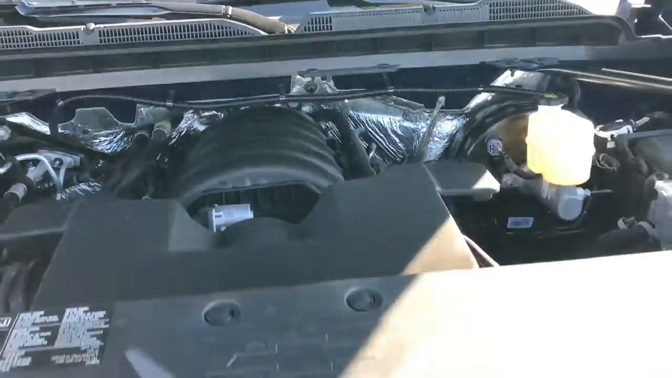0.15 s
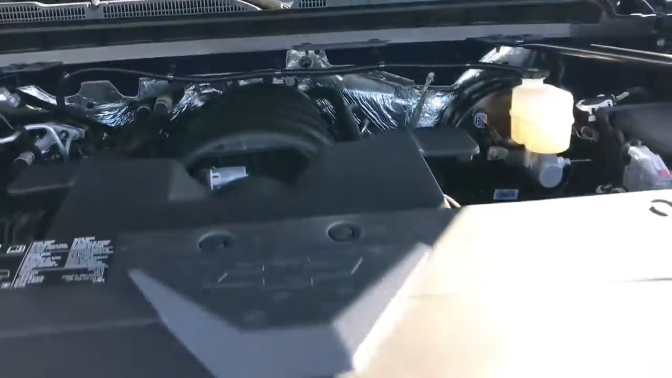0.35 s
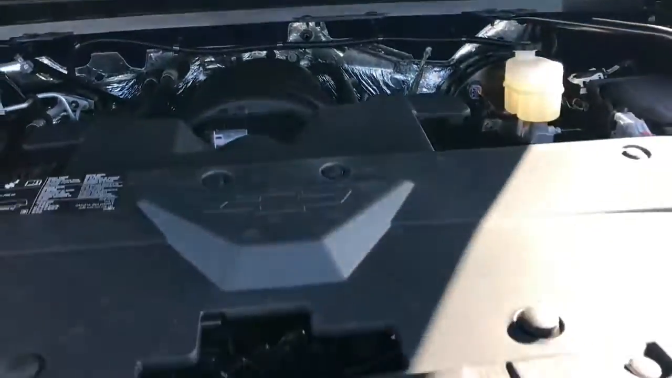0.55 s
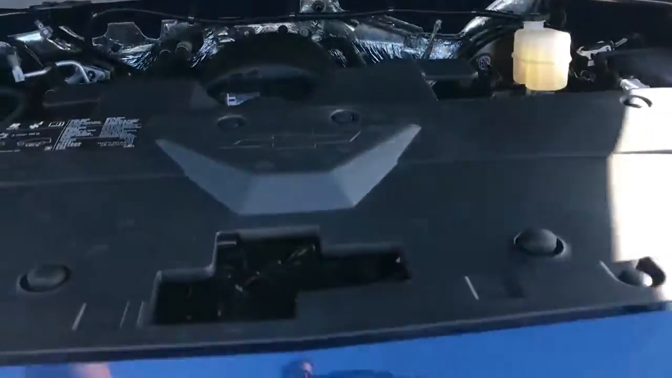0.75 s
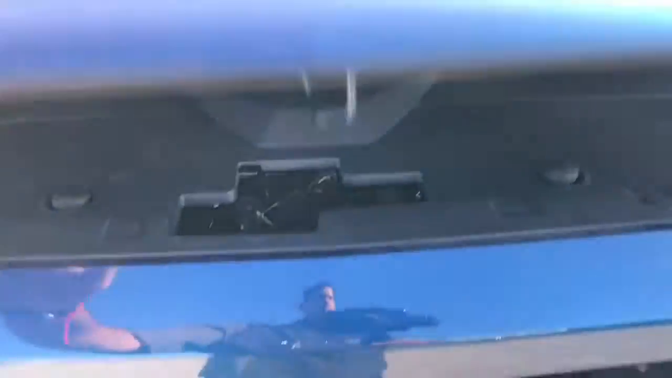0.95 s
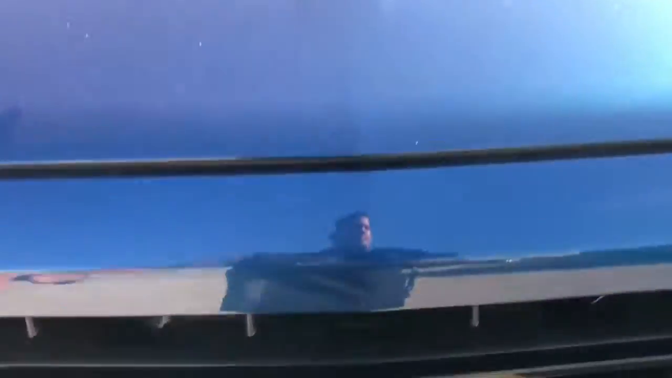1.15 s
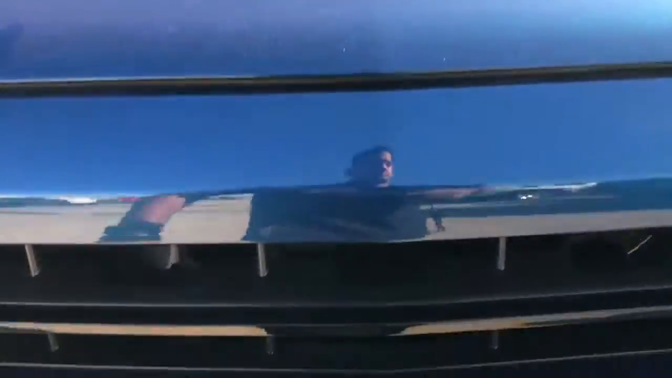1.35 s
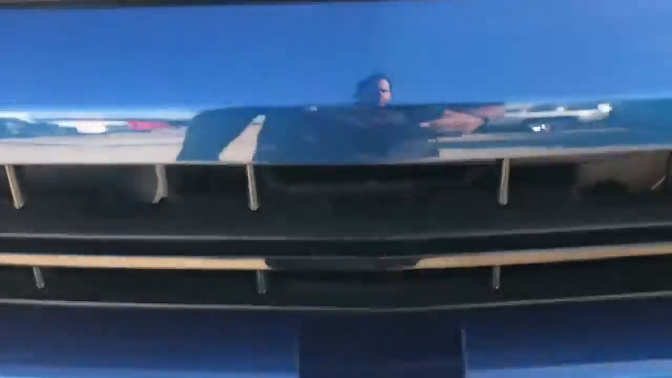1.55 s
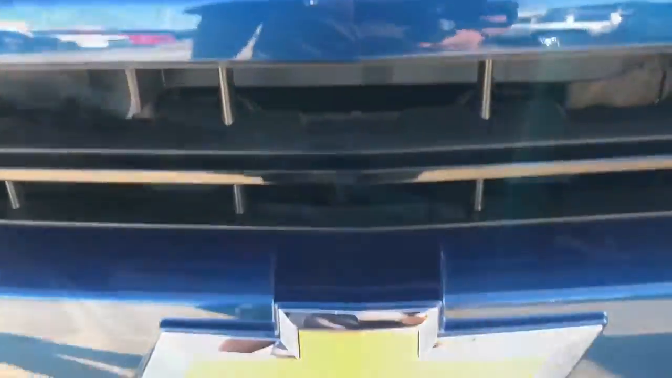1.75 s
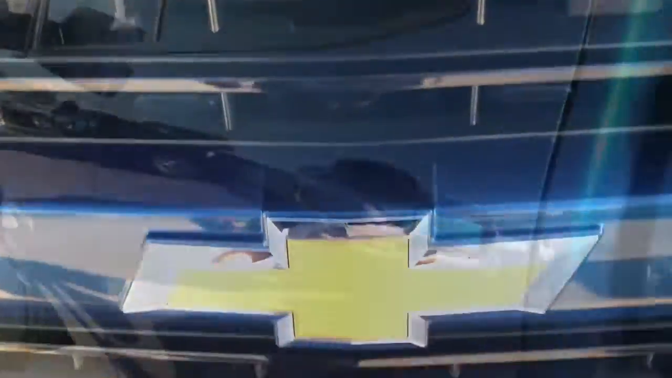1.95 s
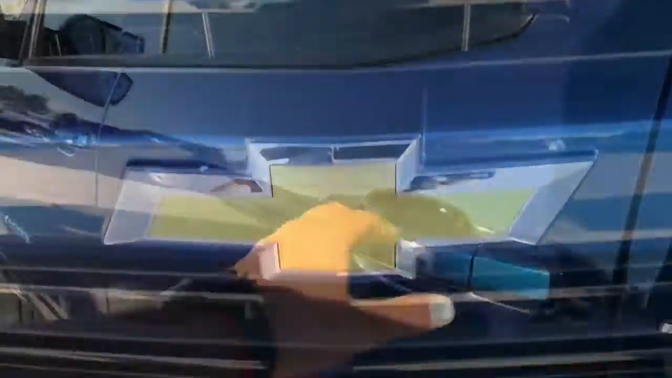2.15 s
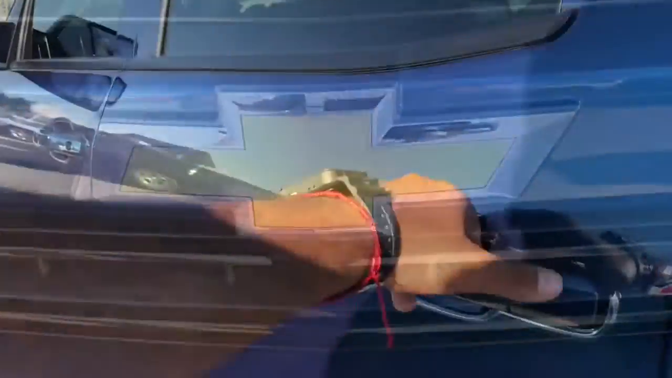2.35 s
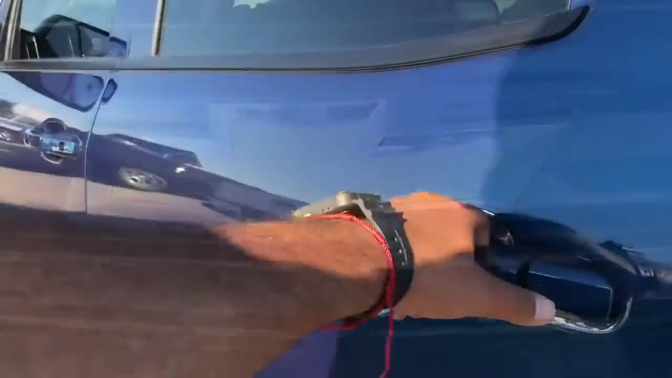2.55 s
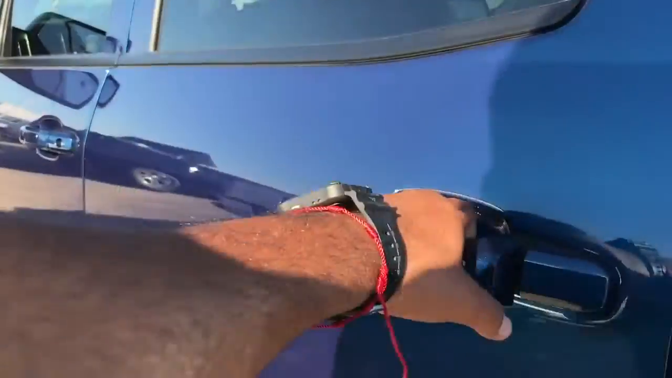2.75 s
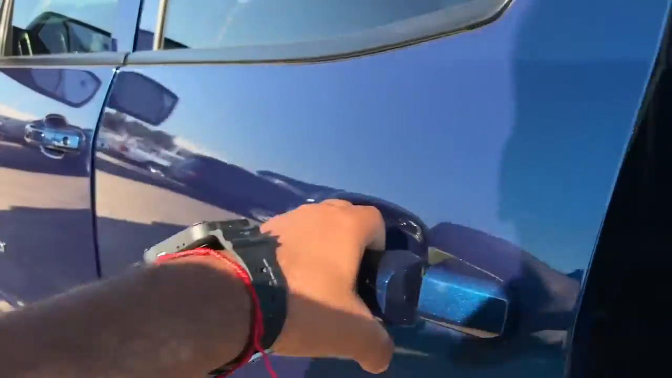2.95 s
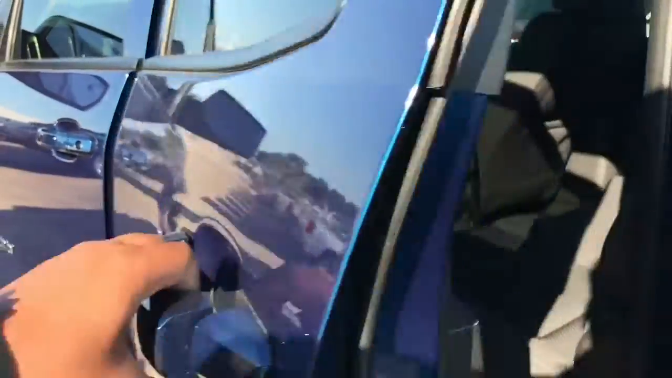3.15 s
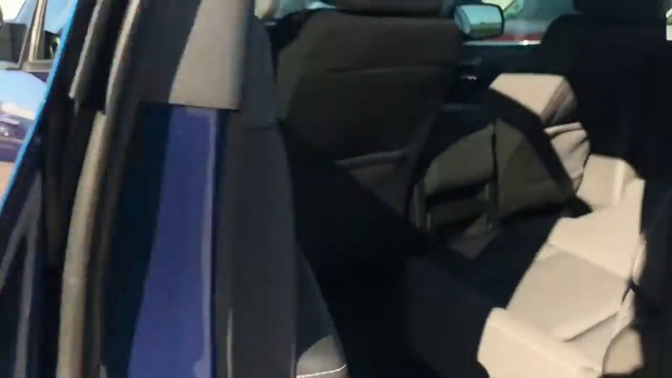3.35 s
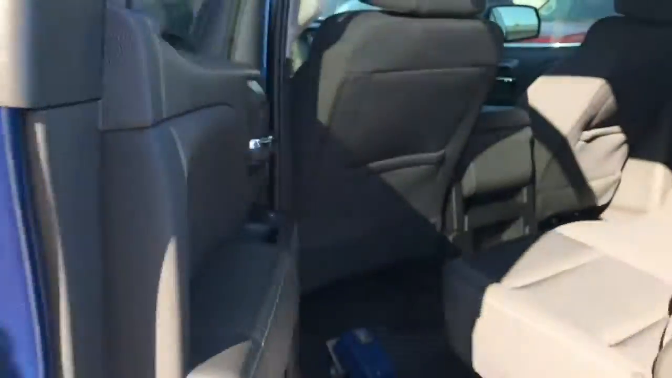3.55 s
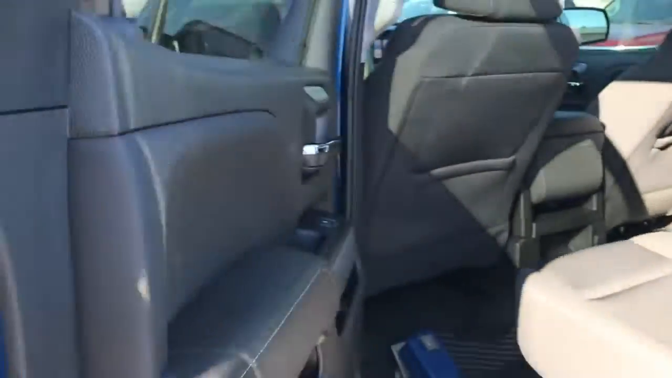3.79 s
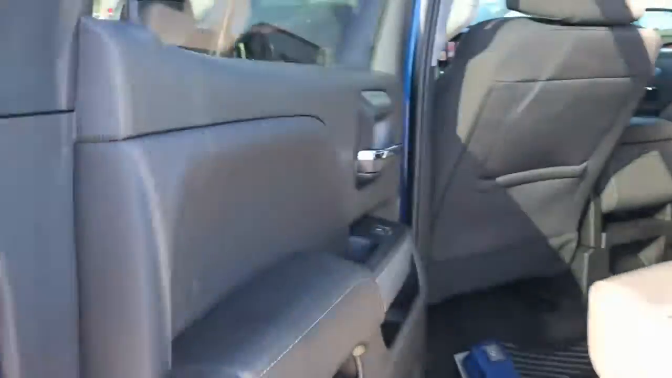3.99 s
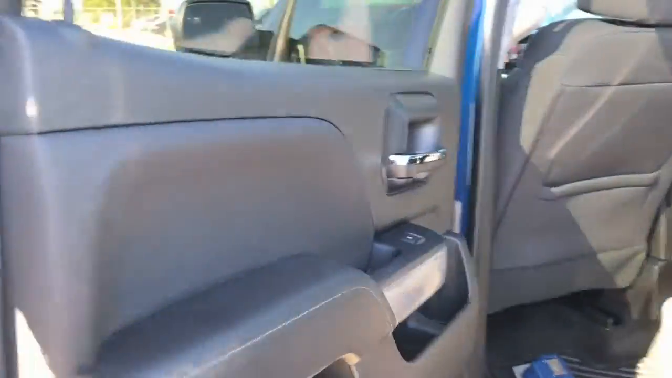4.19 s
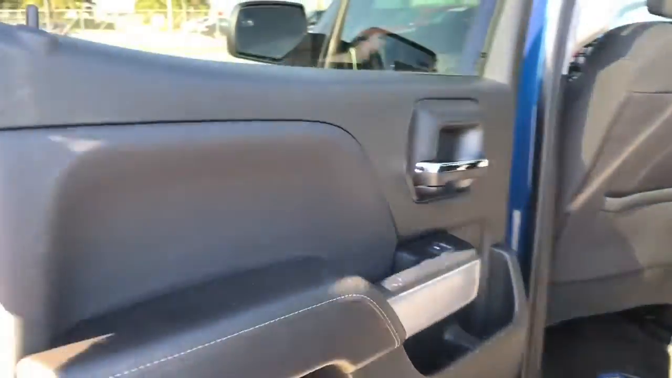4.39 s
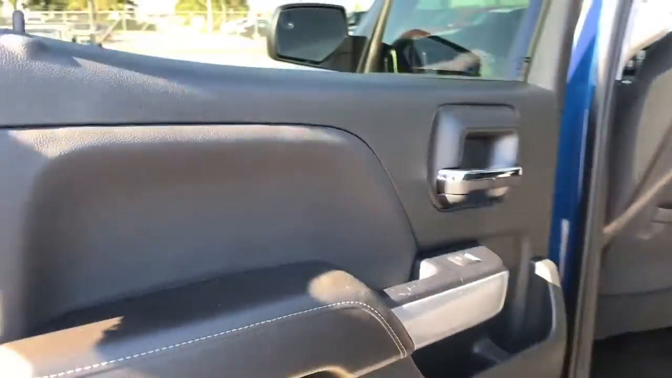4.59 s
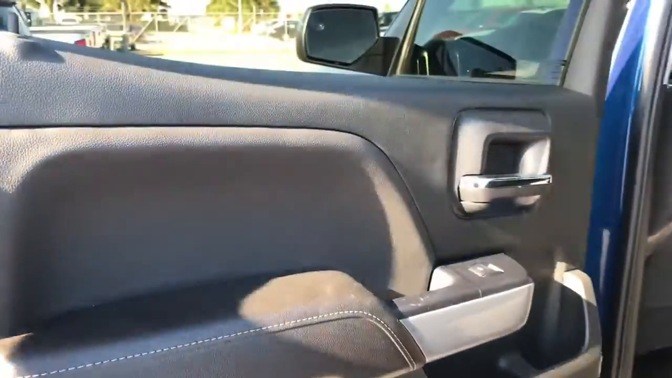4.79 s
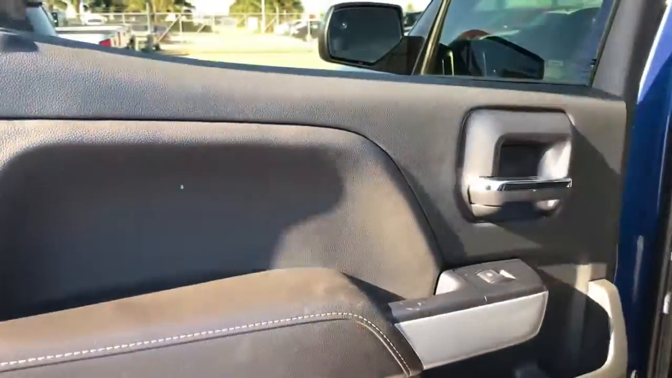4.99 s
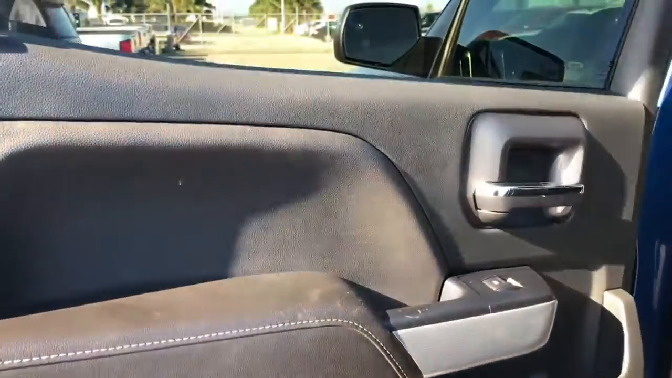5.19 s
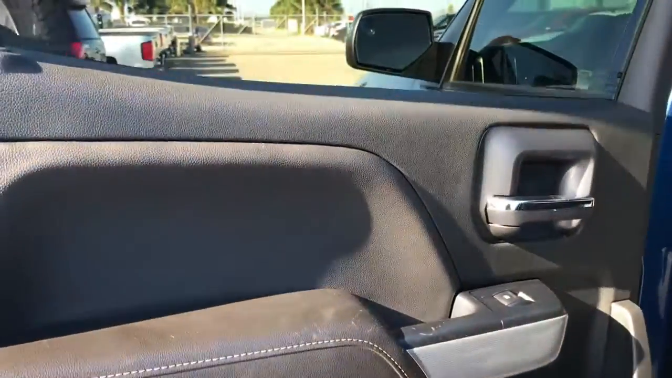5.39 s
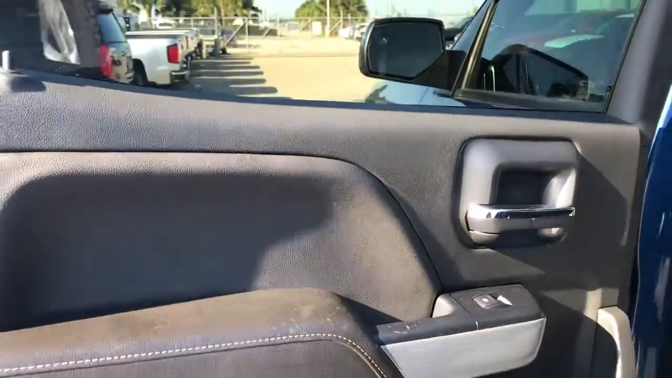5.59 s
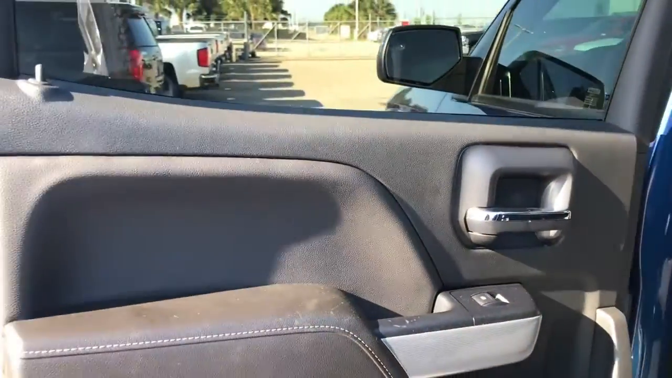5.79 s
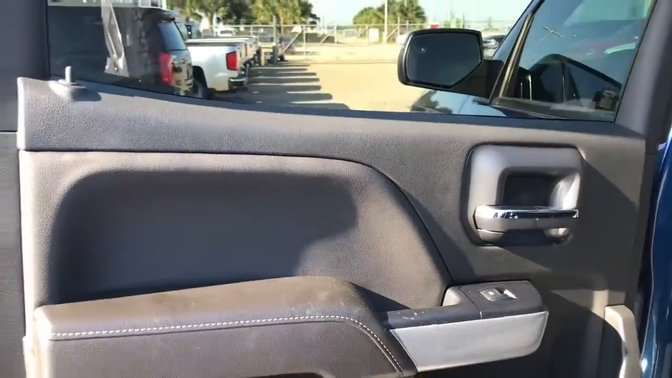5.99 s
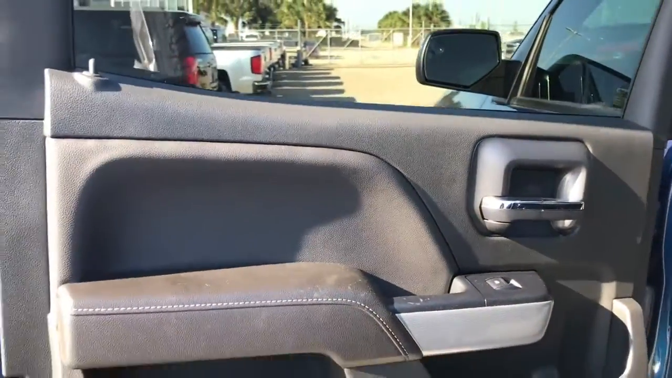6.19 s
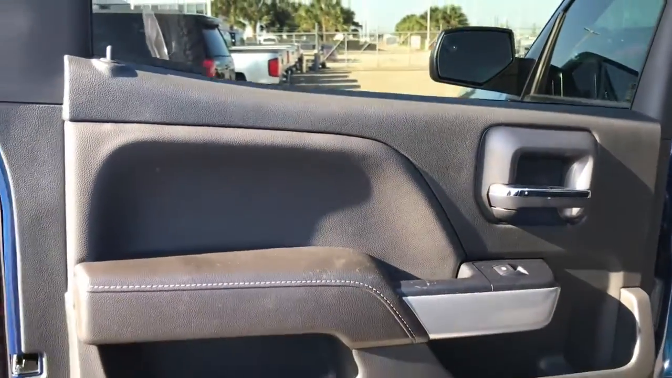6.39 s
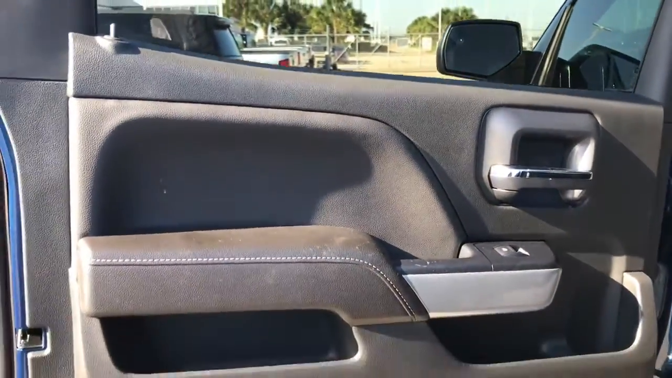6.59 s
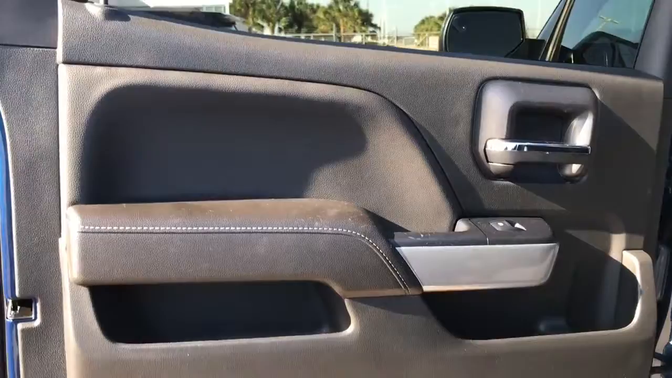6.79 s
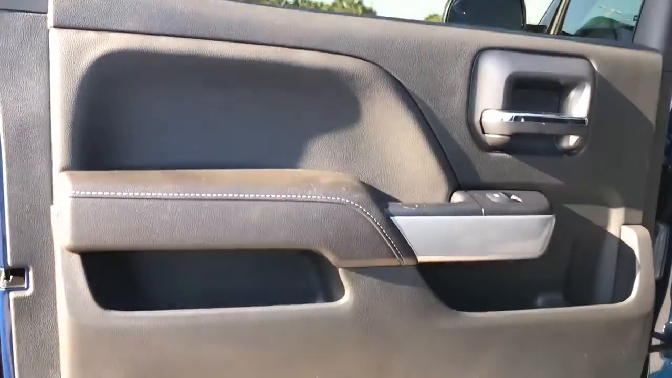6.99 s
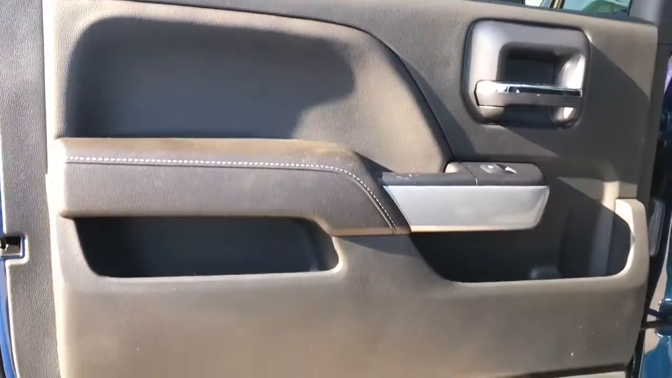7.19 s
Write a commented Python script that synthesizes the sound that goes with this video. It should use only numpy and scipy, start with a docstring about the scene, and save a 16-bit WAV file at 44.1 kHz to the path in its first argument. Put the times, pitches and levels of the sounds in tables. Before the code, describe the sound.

A pickup idles softly outdoors, its hood slams with a huge metallic bang, then a door handle snaps open over louder rumbling and fan noise.

```python
"""A pickup idles in an open lot, heard at the grille as filtered noise with whistles over a rumble.
At 1.2 s the hood is slammed: the latch clashes, the sheet steel chatters, the panel modes boom, and a
limiter ducks the level, which then recovers. Near 2.5 s the sound crossfades to that beside the cab: louder
rumble, drone, fan, hiss and belt chirps. A hand scuffs the door handle, the catch snaps at 2.9 s and the
door opens with thumps and a clink. A low hum swells at 4.7 and 6.5 s; drone and fan drop near 6.2 s."""
import sys
import numpy as np
from scipy import signal
from scipy.fft import rfft, irfft, next_fast_len
from scipy.io import wavfile
from scipy.ndimage import uniform_filter1d, minimum_filter1d

SR = 44100
rng = np.random.default_rng(int(sys.argv[2]) if len(sys.argv) > 2 else 0)


def transcribe(signal):
    """Save signal, clipped to [-1, 1], as a 16-bit WAV file at the path in sys.argv[1]."""
    frames = np.atleast_2d(signal).T
    limited = np.clip(frames, -1, 1)
    pcm = np.round(limited * 32767).astype(np.int16)
    wavfile.write(sys.argv[1], SR, pcm)


N = 319284

# Colours: (frequency [Hz], relative spectrum level [dB])
# Exhaust rumble
RUMBLE_COLOUR = [(25, -8), (40, -13.5), (58, 2), (80, -2), (115, -4), (165, -16.5), (260, -30)]
# Engine at the grille
GRILLE_COLOUR = [(25, -36), (70, -1), (110, -16.5), (150, 0), (300, 0), (400, -9), (480, -9.5),
                 (820, -13.5), (980, -11), (1250, -17.5), (2600, -21), (5000, -29.5), (10000, -36.5),
                 (16000, -36.5)]
# Body drone beside the cab
DRONE_COLOUR = [(120, -6), (180, 3), (240, -1), (320, -4), (420, -6), (500, -16), (900, -28)]
# Cooling fan
FAN_COLOUR = [(250, -7), (460, -6), (570, 2), (750, 0), (1000, 3), (1500, -5), (2100, -12), (3000, -17.5),
              (5000, -22)]
# Hiss beside the cab
HISS_COLOUR = [(1200, 1), (2500, 6.5), (4500, 0.5), (5300, -0.5), (6800, -1.5), (7800, -5), (9500, -2),
               (10700, -6.5), (12500, -2), (16000, -5)]
# Light ticks
TICK_COLOUR = [(900, 9.5), (1600, 4), (3500, -7), (6500, -10.5), (10000, -16), (16000, -14)]
# High rustles
RUSTLE_COLOUR = [(1500, 5), (4000, -1), (8000, -5), (13000, -2), (16000, -8)]
# Hand scuff
SCUFF_COLOUR = [(850, -15), (1150, 1), (1550, 1), (1850, -4), (2100, -24), (4000, -17.5)]
# Door catch click
CLICK_COLOUR = [(300, -7), (700, -8), (1050, 13), (1900, -8), (3000, -12), (4200, -25), (6000, -30),
                (11000, -26.5), (16000, -24)]
# Dry clicks of the settling latch
SETTLE_COLOUR = [(1200, 0), (2500, 5), (3900, 8), (5500, -12), (8000, -15), (15000, -18)]
# Dense ring of the sheet steel
SHEET_COLOUR = [(100, 13.5), (200, 10), (600, 1), (900, 3), (1500, 1.5), (2300, -4), (4600, -6),
                (5300, -8.5), (7000, -9), (10500, -11), (12000, -6), (16000, -7)]

# Decays: (frequency [Hz], t60 [s])
# Door catch click
CLICK_DECAY = [(400, 0.054), (1500, 0.029), (5000, 0.034), (15000, 0.014)]
# Sheet steel
SHEET_DECAY = [(200, 0.32), (900, 0.15), (3000, 0.12), (7000, 0.064), (15000, 0.07)]

# Modes: (frequency [Hz], relative level [dB], t60 [s])
# Door stay
STAY_MODES = [(970, 0.5, 0.034), (1230, -2, 0.016), (1750, -7, 0.02), (2530, -10, .012), (2900, -3, 0.014),
              (4016, -18, 0.04), (4430, -20, .025), (5700, -24, .02)]
# Door on its rubber seal
SEAL_MODES = [(79, -3, 0.046), (124, 2, 0.027), (250, 0, 0.028)]
# Door
DOOR_MODES = [(106, -7, 0.086), (199, 2, 0.038), (237, -5.5, 0.056), (282, -1.5, 0.093), (335, -4, 0.15),
              (403, -8, 0.088)]
# Door catch
CATCH_MODES = [(1027, -2, 0.036), (1230, -0.5, 0.025), (1440, -10, 0.016), (1970, -13, 0.027),
               (2530, -20, 0.022), (3500, -22, 0.035)]
# Latch spring
SPRING_MODES = [(2290, -7, 0.08), (2390, -18, .08), (4340, -12, 0.049), (4580, -4, 0.029),
                (4640, -2, 0.023)]
# Hood panel
HOOD_MODES = [(49.7, 1, 0.18), (96, -0.5, 0.13), (133, -13, .1), (165.5, 5, 0.12), (208.6, -8, 0.15),
              (234, -8.5, 0.25), (257, -12, 0.2), (323, -27, 0.13), (370, -22.5, 0.2), (422, -23, 0.18),
              (540, -12.5, 0.16), (579, -11, 0.13)]
# Hood latch
LATCH_MODES = [(974, -16, 0.09), (990, -22, .09), (1152, -21, 0.13), (1180, -26, .11), (1330, -26, 0.087),
               (1590, -33, 0.079), (1660, -28, 0.1), (2090, -27, 0.11), (2760, -36, 0.14), (3400, -34, .1),
               (3877, -25, .06), (5280, -29, 0.045)]

# Exhaust rumble, louder beside the cab: (time [s], level [dB])
RUMBLE_LEVEL = [(0, -52.5), (2.25, -44.5), (2.5, -37.5), (3.7, -36), (4.6, -36.5), (5.2, -36.5), (6, -37),
                (7.2, -32.5)]
# Thin whine, a long faint swell with a short peak: (centre [s], width [s], level [dB])
WHINE_SWELLS = [(4.5, 1.1, -73.0), (4.22, .13, -66.5)]
# Low hum: (start [s], length [s], level before growth [dB])
HUM_SWELLS = [(4.748, 1.42, -34.5), (6.537, 0.54, -32)]
# Clearest belt squeaks: (time [s], pitch [Hz], level [dB])
SQUEAKS = [(3.289, 3970, -57), (3.594, 4470, -63), (3.819, 4030, -64), (4.036, 4048, -56),
           (4.677, 4430, -60), (5.098, 3150, -57), (6.196, 4069, -60), (6.947, 4000, -58),
           (7.049, 4500, -62)]
# Belt chirp bands: (centre [Hz], rate of random amplitude steps [1/s], relative level [dB])
CHIRP_BANDS = [(2800, 300, 2.5), (3280, 260, -3), (4020, 270, 0.5), (4520, 320, 1.5)]
# Whistles at the grille: (frequency [Hz], width of one filter pass [Hz], relative level [dB])
WHISTLES = [(405.5, 13, -11.5), (990, 42, -18), (8340, 400, -30)]
# Steady tones beside the cab: (frequency [Hz], level [dB])
TONES = [(59.2, -41.5), (290, -54), (425, -59), (545, -61)]
# Fingers, handle and trim: (time [s], level [dB], top edge [Hz])
TICKS = [(2.399, -39, 2000), (2.592, -40.5, 9000), (2.6518, -33, 18000), (2.661, -33, 18000),
         (2.676, -34, 3000), (2.810, -36, 7000), (2.8487, -20, 2600), (2.8515, -24, 4000),
         (2.855, -26.5, 17000), (2.884, -28, 4500), (3.198, -37, 9000), (4.02, -38, 7000),
         (5.453, -36, 9000)]
# Door stay clinking as the door starts to swing: (time [s], level [dB])
STAY_CLINKS = [(3.3902, -42), (3.3927, -26.5), (3.3942, -44)]
# Faint high rustles: (time [s], level [dB])
RUSTLES = [(2.587, -58), (2.657, -53), (6.315, -55), (6.34, -52), (6.68, -49), (6.708, -52), (6.731, -46)]
# Hand sliding on the handle: (time [s], level [dB])
SCUFFS = [(2.395, -46), (2.455, -53), (2.56, -60), (2.79, -54), (3.26, -49)]
# Door handle knocks, soft bumps around the truck: (time [s], level [dB], contact time [s])
KNOCKS = [(.096, -29, 0.0033), (.403, -32, 0.0034), (1.515, -32, 0.0027), (1.533, -23.5, 0.0038),
          (2.8492, -14, 0.00077), (2.855, -15, 0.0015), (2.8683, -18, 0.0012), (2.897, -28, 0.0028),
          (2.9045, -20, 0.0046), (2.9205, -27, 0.0021)]
# Door pulling free of its seal and swaying: (time [s], level [dB], contact time [s])
THUMPS = [(3.056, -18.5, 0.0068), (3.105, -19, 0.0053), (3.3403, -17, 0.0035), (3.3475, -16, 0.007),
          (3.3621, -16.5, 0.0016), (3.601, -19, 0.0055)]
# Door catch snapping open, then two faint settling clicks: (time [s], level [dB])
CLICKS = [(2.8555, -17.5), (2.860, -32), (2.873, -36)]
# Hood latch striking and catching: (time [s], level [dB], low edge [Hz], high edge [Hz])
HOOD_CLASHES = [(1.167, -12.5, 2600, 15000), (1.1733, -2.5, 740, 4500), (1.1819, 1.5, 2200, 16500),
                (1.1926, 6, 447, 4000), (1.1962, 4.5, 9000, 19000)]
# Hood landing on its stops: (time [s], level [dB], contact time [s])
HOOD_BLOWS = [(1.171, -23.5, 0.0027), (1.196, 9.5, 0.0016), (1.2085, 2, 0.0047), (1.2245, -15, 0.0055),
              (1.2507, -15, 0.003), (1.2755, -35, .002), (1.315, -27, .003)]
# Hood rattling to rest: (time [s], level [dB])
RATTLES = [(1.2095, -6), (1.217, -14), (1.2355, -15), (1.256, -28), (1.275, -37)]
# Latch settling: (time [s], level [dB])
SETTLES = [(1.2985, -37), (1.2998, -32), (1.3345, -44)]

# Crossfade from the sound at the grille to that beside the cab
CROSSFADE_S, CROSSFADE_EASE_S = 2.51, 0.056
# Grille level, and its loss once the hood is shut
GRILLE_DB, SHUT_LOSS_DB = -42.5, 1
DRONE_DB, FAN_DB, HISS_DB = -41.5, -45.0, -56
# Open door lets more hiss through
OPEN_S, OPEN_EASE_S, OPEN_HISS_DB = 3.76, 0.17, 2
# Late drop of drone, fan and tones
LULL_S, LULL_EASE_S = 6.16, 0.31
LULL_DRONE_DB, LULL_FAN_DB, LULL_TONES_DB = 4.5, 3, 22
DRONE_SWELL_S, DRONE_SWELL_WIDTH_S, DRONE_SWELL_DB = 5.26, 0.37, 3.5
HUM_HZ, HUM_ATTACK_S, HUM_GROWTH_DB_PER_S, HUM_RELEASE_DB_PER_S = 116, 0.19, 3, 44
WHINE_HZ = 14987
# Belt: first chirp, share of a turn it lasts, level relative to the hiss
CRANK_TURNS_PER_S = 9.292
BELT_FIRST_S, BELT_SHARE, BELT_DB = 2.39, 0.8, -9
SCUFF_T60_S, CATCH_DB = 0.68, -2
CUTOFF_HZ = 15900


def from_db(db):
    """Decibels to gain."""
    return 10 ** (np.asarray(db) / 20)


def rms_one(x):
    """Scale to unit rms."""
    return x / np.sqrt(np.mean(x ** 2) + 1e-20)


def seconds():
    """Time of every sample."""
    return np.arange(N) / SR


def ease(at_s, ease_s):
    """Smooth step from 0 to 1, halfway at at_s."""
    return .5 + .5 * np.tanh((seconds() - at_s) / (2 * ease_s))


def bell(at_s, width_s):
    """Smooth rise to 1 and fall."""
    return np.exp(-((seconds() - at_s) / width_s) ** 2)


def at_hz(points, hz):
    """Read a table on a log-frequency axis."""
    known_hz, values = np.transpose(points)
    return np.interp(np.log(np.maximum(hz, 1)), np.log(known_hz), values)


def noise(colour):
    """Unit-rms noise with a given spectrum, falling away beyond its ends."""
    size = next_fast_len(N)
    hz = np.arange(size // 2 + 1) * SR / size + 1
    low_skirt = np.minimum(hz / colour[0][0], 1) ** 2
    high_skirt = np.minimum(colour[-1][0] / hz, 1) ** 2
    white = rfft(rng.standard_normal(size))
    shaped = white * from_db(at_hz(colour, hz)) * low_skirt * high_skirt
    return rms_one(irfft(shaped, size)[:N])


def drift(per_s):
    """Unit-rms random wander: straight lines between per_s random knots a second."""
    knots = rng.standard_normal(4000)
    return rms_one(np.interp(seconds() * per_s, np.arange(len(knots)), knots))


def sine(hz):
    """Unit-rms tone of steady or moving pitch, random phase."""
    turns = np.cumsum(hz * np.ones(N)) / SR + rng.random()
    return np.sqrt(2) * np.sin(2 * np.pi * turns)


def impulses(rows):
    """One single-sample click per (time [s], level [dB]) row."""
    out = np.full(N, 1e-18)
    for s, level_db in rows:
        out[round(s * SR)] += from_db(level_db)
    return out


def pushes(rows):
    """Soft contacts, each a half sine of the given area: the longer, the duller."""
    out = np.full(N, 1e-18)
    for s, level_db, contact_s in rows:
        shape = np.sin(np.linspace(0, np.pi, max(round(contact_s * SR), 3)))
        out[round(s * SR):][:len(shape)] += from_db(level_db) * shape / shape.sum()
    return out


def ring(clicks, modes):
    """Each click sets every mode ringing as a dying sine."""
    out = np.zeros(N)
    for hz, level_db, t60_s in modes:
        radius = from_db(-60 / (t60_s * SR))
        angle = 2 * np.pi * hz / SR
        poles = [1, -2 * radius * np.cos(angle), radius ** 2]
        out += from_db(level_db) * signal.lfilter([0, np.sin(angle)], poles, clicks)
    return out


def dying(clicks, t60_s):
    """Envelope of blows whose energies add up and die away."""
    energy_keep = np.exp(-2 * np.log(1000) / (t60_s * SR))
    return np.sqrt(signal.lfilter([1], [1, -energy_keep], clicks ** 2))


def dense_ring(clicks, colour, decay, chatter_db=0):
    """Noise for countless overlapping modes; each octave dies at its own rate and may chatter."""
    rest, out = noise(colour), np.zeros(N)
    for hz in 250 * 2 ** np.arange(7):
        edge_hz = min(hz * np.sqrt(2), SR / 2 - 1)
        # peel octaves off from the bottom
        band = signal.sosfiltfilt(signal.butter(3, edge_hz, fs=SR, output="sos"), rest)
        rest = rest - band
        out += band * dying(clicks, at_hz(decay, hz)) * from_db(chatter_db * drift(200))
    return out


def between(x, low_hz, high_hz):
    """Gentle band-pass: the colour of one contact."""
    return signal.sosfilt(signal.butter(1, [low_hz, high_hz], "band", fs=SR, output="sos"), x)


def dull(x, top_hz):
    """A softer contact loses its treble."""
    return signal.sosfilt(signal.butter(2, top_hz, fs=SR, output="sos"), x)


def resonate(x, modes):
    """Narrow resonances, filtered twice for steep skirts, each at its own rms level."""
    out = np.zeros(N)
    for hz, width_hz, level_db in modes:
        b, a = signal.iirpeak(hz, hz / width_hz, SR)
        once = signal.lfilter(b, a, x)
        out += from_db(level_db) * rms_one(signal.lfilter(b, a, once))
    return out


def whine(wander_hz=18.0):
    """A thin whine of unsteady pitch comes and goes."""
    level = sum(from_db(level_db) * bell(s, width_s) for s, width_s, level_db in WHINE_SWELLS)
    return level * sine(WHINE_HZ + wander_hz * drift(120))


def hum(octave_db=-18.5, waver_db=2.5, wander_hz=0.84):
    """A low hum with a weak octave: each swell sets in, grows slowly and dies away."""
    level = np.zeros(N)
    for start_s, length_s, level_db in HUM_SWELLS:
        age_s = seconds() - start_s
        growth_db = HUM_GROWTH_DB_PER_S * np.clip(age_s, 0, length_s)
        release_db = HUM_RELEASE_DB_PER_S * np.maximum(age_s - length_s, 0)
        attack = np.clip(age_s / HUM_ATTACK_S, 0, 1)
        level += attack * from_db(level_db + growth_db - release_db)
    hz = HUM_HZ + wander_hz * drift(5)
    octave = from_db(octave_db + waver_db * drift(3.6)) * sine(2 * hz)
    return level * (sine(hz) + octave)


def squeaks(width_s=0.018, wander_hz=40.3):
    """The belt's clearest squeaks: short, nearly pure tones sharing one pitch waver."""
    waver_hz = wander_hz * drift(90)
    return sum(from_db(level_db) * bell(s, width_s) * sine(hz + waver_hz) for s, hz, level_db in SQUEAKS)


def belt(wander_hz=40.3, slip_turns=0.081):
    """The belt chirps about once per crank turn in bands of wandering pitch, well under the hiss."""
    turns = (seconds() - BELT_FIRST_S) * CRANK_TURNS_PER_S + slip_turns * drift(8)
    rub = np.sin(np.pi * np.minimum(turns % 1 / BELT_SHARE, 1))
    chirps = sum(from_db(level_db) * drift(rate_per_s) * sine(hz + wander_hz * drift(14))
                 for hz, rate_per_s, level_db in CHIRP_BANDS)
    return from_db(BELT_DB) * rms_one(rub * chirps)


def engine_at_grille(flutter_db=0.9, whistle_loss_db=1.5):
    """Idle rush with a few whistles; the closed hood muffles both, the whistles more."""
    shut = seconds() > HOOD_BLOWS[1][0]
    whistles = from_db(-whistle_loss_db * shut) * resonate(rng.standard_normal(N), WHISTLES)
    level_db = GRILLE_DB - SHUT_LOSS_DB * shut + flutter_db * drift(15)
    return from_db(level_db) * (noise(GRILLE_COLOUR) + whistles)


def engine_at_cab(flutter_db=0.88, waver_db=4.0):
    """Body drone, cooling fan, hiss with the belt in it, and steady-pitched tones."""
    lull = ease(LULL_S, LULL_EASE_S)
    swell_db = DRONE_SWELL_DB * bell(DRONE_SWELL_S, DRONE_SWELL_WIDTH_S)
    drone = from_db(DRONE_DB + swell_db - LULL_DRONE_DB * lull) * noise(DRONE_COLOUR)
    fan = from_db(FAN_DB - LULL_FAN_DB * lull + flutter_db * drift(25)) * noise(FAN_COLOUR)
    hiss_db = HISS_DB + OPEN_HISS_DB * ease(OPEN_S, OPEN_EASE_S)
    hiss = from_db(hiss_db) * (noise(HISS_COLOUR) + belt())
    tones = sum(from_db(level_db + waver_db * drift(9.1)) * sine(hz + drift(6)) for hz, level_db in TONES)
    return drone + fan + hiss + from_db(-LULL_TONES_DB * lull) * tones


def engine(throb_db=1.4):
    """Equal-power crossfade from grille to cab, over an exhaust rumble that throbs at random."""
    at_cab = ease(CROSSFADE_S, CROSSFADE_EASE_S)
    rumble_db = np.interp(seconds(), *np.transpose(RUMBLE_LEVEL))
    rumble = from_db(rumble_db + throb_db * drift(17)) * noise(RUMBLE_COLOUR)
    return np.sqrt(1 - at_cab) * engine_at_grille() + np.sqrt(at_cab) * engine_at_cab() + rumble


def ticks(tick_t60_s=0.012, stay_tick_db=-2.0, stay_top_hz=9000):
    """Light contacts tick and die at once, each with its own brightness; the door stay also rings."""
    grain, clinks = noise(TICK_COLOUR), impulses(STAY_CLINKS)
    light = sum(dull(grain * dying(impulses([(s, level_db)]), tick_t60_s), top_hz)
                for s, level_db, top_hz in TICKS)
    stay_tick = from_db(stay_tick_db) * dull(grain * dying(clinks, tick_t60_s), stay_top_hz)
    return light + stay_tick + ring(clinks, STAY_MODES)


def door(grip_db=1.0, rustle_width_s=0.013, click_db=-1.0):
    """A hand scuffs the handle, the catch clicks and rings, the damped door knocks, rustles sound."""
    scuff = noise(SCUFF_COLOUR) * dying(impulses(SCUFFS), SCUFF_T60_S) * from_db(grip_db * drift(45))
    knocks = ring(pushes(KNOCKS), DOOR_MODES) + ring(pushes(THUMPS), SEAL_MODES)
    taps = impulses(CLICKS)
    clicks = from_db(click_db) * dense_ring(taps, CLICK_COLOUR, CLICK_DECAY)
    catch = from_db(CATCH_DB) * ring(taps, CATCH_MODES)
    rustle_level = sum(from_db(level_db) * bell(s, rustle_width_s) for s, level_db in RUSTLES)
    return scuff + knocks + clicks + catch + noise(RUSTLE_COLOUR) * rustle_level


def steel(rows, sheet_db=-3.0):
    """Hard contacts ring the latch and set the sheet steel chattering."""
    clicks = impulses(rows)
    sheet = dense_ring(clicks, SHEET_COLOUR, SHEET_DECAY, chatter_db=2.4)
    return from_db(sheet_db) * sheet + ring(clicks, LATCH_MODES)


def hood(panel_db=-3.0, settle_t60_s=0.014, rattle_top_hz=11000):
    """The latch clashes, its spring twangs; the panel lands on rubber stops, booms, rattles to rest."""
    clashes = sum(between(steel([(s, level_db)]), low_hz, high_hz)
                  for s, level_db, low_hz, high_hz in HOOD_CLASHES)
    spring = ring(impulses([(HOOD_CLASHES[2][0], 0)]), SPRING_MODES)
    settles = noise(SETTLE_COLOUR) * dying(impulses(SETTLES), settle_t60_s)
    rattles = dull(steel(RATTLES), rattle_top_hz)
    boom = from_db(panel_db) * ring(pushes(HOOD_BLOWS), HOOD_MODES)
    # the boom pushes the other way
    return clashes + spring + rattles + settles - boom


def scene():
    """All sources summed into one channel, without reverberation."""
    return (whine() + hum() + squeaks() + engine() + ticks() + door() + hood())[None]


def limiter(x, ceiling_db, release_db_per_s):
    """The gain drops just ahead of a peak and climbs back steadily."""
    over_db = np.maximum(20 * np.log10(np.abs(x) + 1e-9) - ceiling_db, 0)
    climb_db = release_db_per_s * seconds()
    cut_db = np.maximum.accumulate(over_db + climb_db, axis=-1) - climb_db
    gain_db = uniform_filter1d(minimum_filter1d(-cut_db, size=65), size=65)
    return x * from_db(gain_db)


def record(dry):
    """Bass roll-off, a slow limiter that ducks, a quick one that flattens peaks, a steep top cut."""
    thinned = signal.sosfilt(signal.butter(3, 36, "high", fs=SR, output="sos"), dry)
    ducked = limiter(thinned, ceiling_db=-0.5, release_db_per_s=40.0)
    flat = limiter(ducked, ceiling_db=-9.7, release_db_per_s=900)
    return signal.sosfilt(signal.ellip(10, .1, 80, CUTOFF_HZ, fs=SR, output="sos"), flat)


dry = scene()
out = record(dry)
transcribe(out)
```